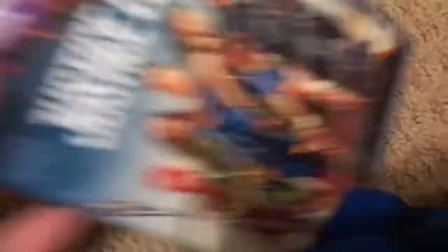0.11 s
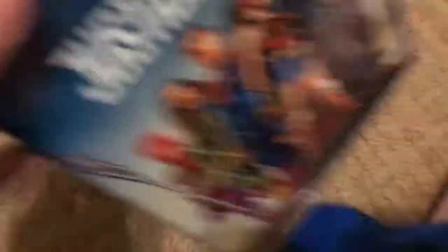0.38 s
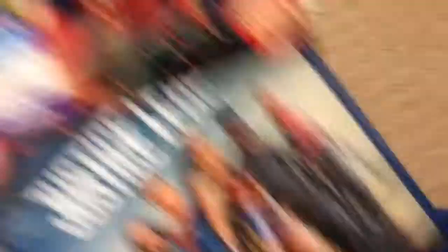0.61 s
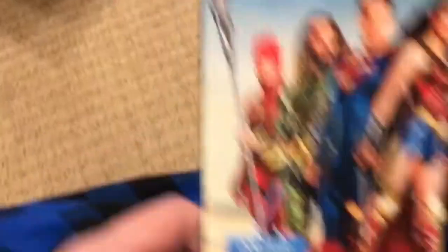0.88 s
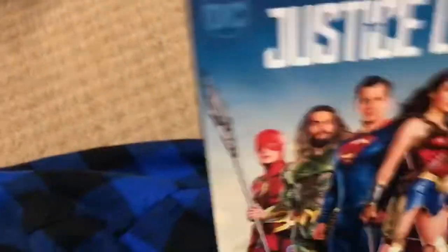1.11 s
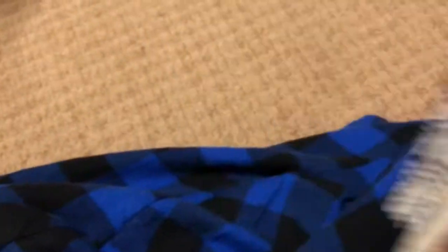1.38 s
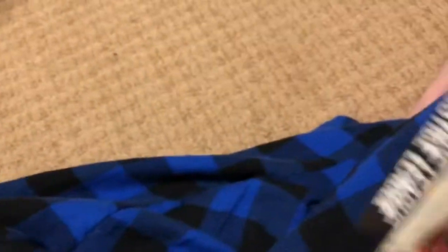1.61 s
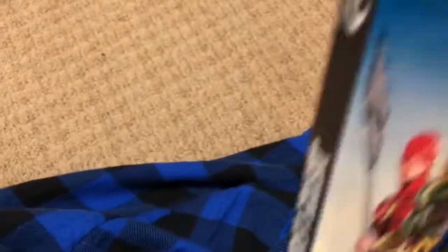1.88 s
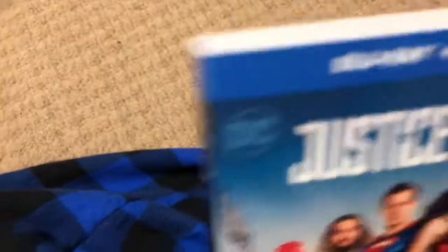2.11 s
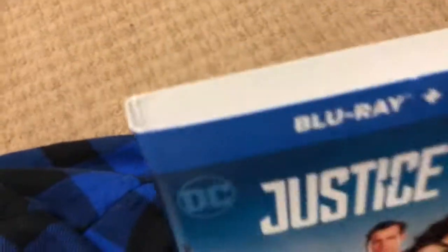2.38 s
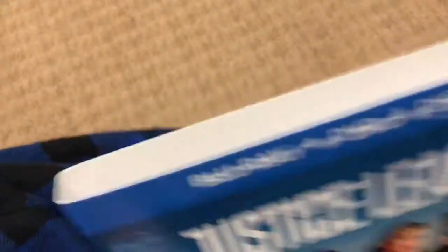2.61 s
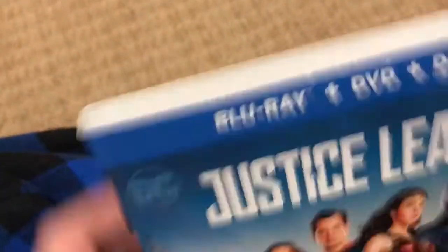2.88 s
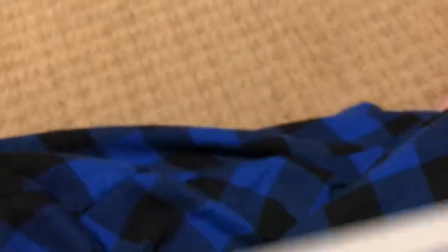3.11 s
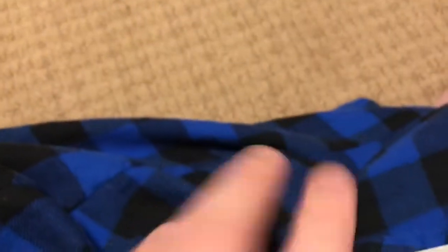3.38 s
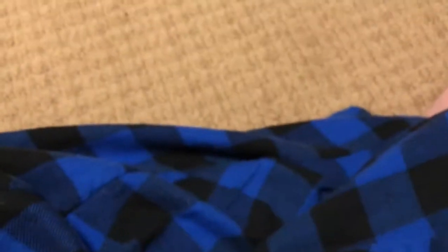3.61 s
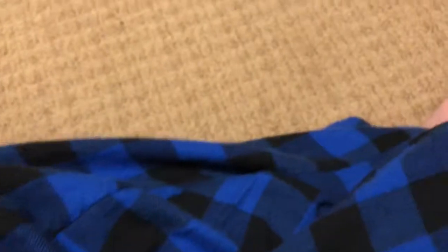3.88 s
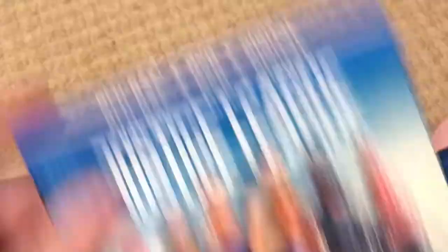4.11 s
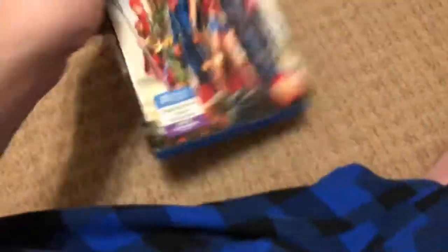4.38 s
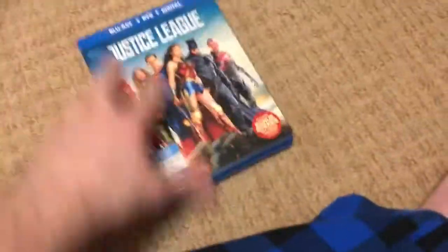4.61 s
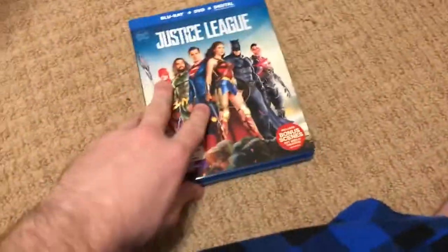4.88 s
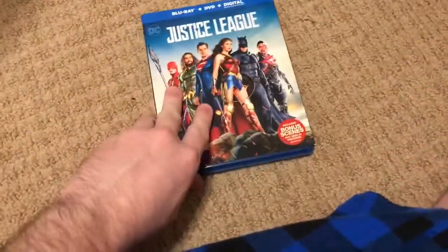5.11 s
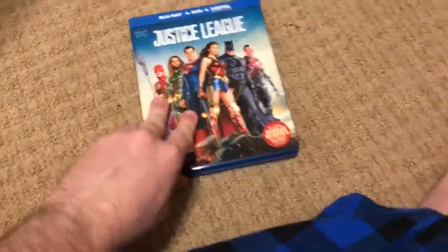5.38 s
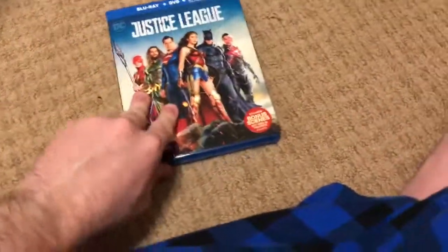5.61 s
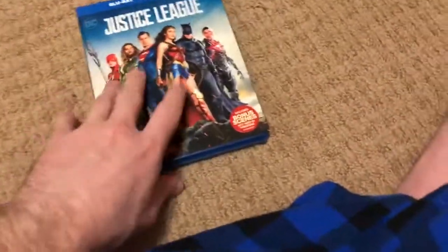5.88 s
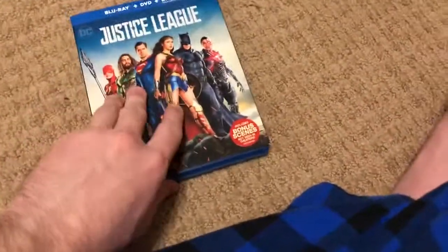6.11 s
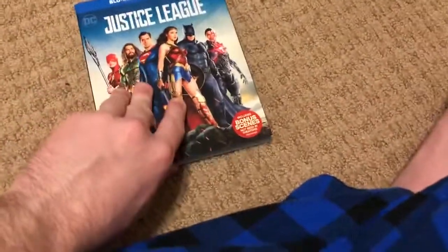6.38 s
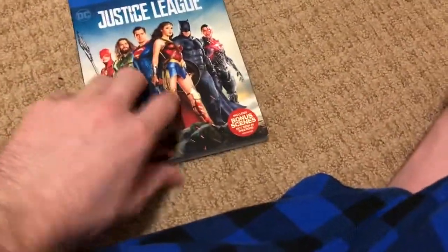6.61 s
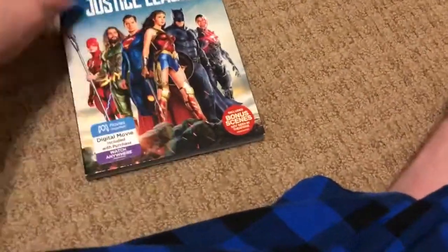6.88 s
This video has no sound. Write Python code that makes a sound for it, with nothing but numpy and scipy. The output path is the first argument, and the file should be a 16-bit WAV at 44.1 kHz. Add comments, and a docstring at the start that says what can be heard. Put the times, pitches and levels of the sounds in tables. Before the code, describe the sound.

Fingers slide and scrape over a thin plastic case close by, with hard clicks, a carpet landing, light taps and one late snap over faint hum.

```python
"""Throughout: low house hum and faint hiss, as shaped noise, under the rubbing of hands, fingers and card
on a plastic disc case close to a phone: stick-slip grains, strongest near 3.2 s, softly answered by a room.
From 0.1 s: cushioned bumps and hard snaps, bursts of micro-impacts ringing the case; loudest snap 1.75 s.
From 2.1 s: thuds on lap and carpet, decaying low sines; heaviest landing 4.6 s. A last hard snap: 6.4 s."""
import sys
import numpy as np
from scipy import signal
from scipy.fft import rfft, irfft, next_fast_len
from scipy.io import wavfile
from scipy.ndimage import uniform_filter1d, map_coordinates

SR = 44100
rng = np.random.default_rng(int(sys.argv[2]) if len(sys.argv) > 2 else 0)


def store_wav(level_fs):
    """Save 16-bit WAV to argv[1]."""
    pcm = np.round(np.clip(np.atleast_2d(level_fs), -1, 1) * 32767)
    wavfile.write(sys.argv[1], SR, pcm.T.astype(np.int16))


def volts(x):
    """Linear amplitude factor 10**(x/20) for a level x in dB, scalar or array-like."""
    e = np.asarray(x, float) / 20
    return 10 ** e


N = 308259  # samples


def unit(x):
    """Scale to rms 1."""
    return x / np.sqrt(np.mean(x ** 2) + 1e-20)


def along(points, hz):
    """(frequency [Hz], value) points read on a log axis."""
    point_hz, value = np.transpose(points)
    return np.interp(np.log(hz + 1), np.log(point_hz + 1), value)


def wobble(rate_hz):
    """Smooth random curve through rate_hz knots a second."""
    knots = rng.standard_normal(int(N * rate_hz / SR) + 4)
    return map_coordinates(knots, [np.arange(N) * rate_hz / SR])


def filtered(x, response):
    """x times a complex response of frequency."""
    size = next_fast_len(N + SR // 2)
    spectrum = rfft(x, size) * response(np.fft.rfftfreq(size, 1 / SR))
    return irfft(spectrum, size)[:N]


def coloured(x, spectrum):
    """x in the given colour, rms 1."""
    return unit(filtered(x, lambda hz: volts(along(spectrum, hz))))


# house hum in the room's low modes: (frequency [Hz], relative density [dB per Hz])
HUM_COLOUR = [(15, -63.5), (25, -24), (64, -11), (94, -2.5), (108, -0.5), (129, -0.5), (145, -19),
              (164, -7), (181, -7), (195, -15), (211, -13), (284, -21.5), (322, -44.5), (404, -47.5),
              (500, -54), (650, -81), (1100, -120)]
# still air and microphone hiss: (frequency [Hz], relative density [dB per Hz])
AIR_COLOUR = [(180, -34), (300, -4), (863, -14), (1130, -24), (1250, -19), (2240, -29), (3030, -24),
              (15200, -30), (16500, -38)]
HUM_DB, AIR_DB = -56, -71  # mean rms levels


def background():
    """House hum that swells a little, and a nearly steady hiss: two shaped noises."""
    hum = coloured(rng.standard_normal(N), HUM_COLOUR)
    air = coloured(rng.standard_normal(N), AIR_COLOUR)
    return volts(HUM_DB + 1.5 * wobble(3)) * hum + volts(AIR_DB + 0.23 * wobble(7.3)) * air


# skin and card sliding on the sleeve, a row a stroke: (start [s], end [s], hiss at start [dB],
# hiss at end [dB], shell scrape re hiss [dB], card drag re hiss [dB])
STROKES = [(0.033, 0.074, -75, -66, 12.5, 15.5), (0.087, 0.187, -71, -71, 2, 5.5),
           (0.202, 0.285, -70, -72.5, 3, 5), (0.305, 0.392, -73.5, -71, -4, -6),
           (0.396, 0.5, -69.5, -75.5, -7, -7.5), (0.67, 0.705, -89, -85.5, 13.5, 12.5),
           (0.85, 0.922, -78, -68, -6, -6), (0.933, 0.993, -62, -65, -2, 1),
           (1.065, 1.146, -66, -64.5, 1.5, 0.5), (1.197, 1.283, -67, -72.5, 4, -3),
           (1.327, 1.42, -69.5, -58, -9, -10), (1.42, 1.483, -61, -66, -2, -4),
           (1.544, 1.637, -74, -70, 7.5, 7.5), (1.645, 1.668, -74.5, -76, 0, 16.5),
           (1.681, 1.724, -64.5, -66, 8, 7.5), (1.763, 1.822, -59, -71, 7, -11),
           (1.835, 1.889, -71, -65, 8.5, 4), (1.983, 2.08, -66.5, -61, 1, -2.5),
           (2.075, 2.113, -58.5, -55.5, 0.5, -2), (2.212, 2.338, -69, -75, 7, 6.5),
           (2.474, 2.544, -73, -69.5, 4.5, 0.5), (2.61, 2.703, -70, -53.5, -1, -5),
           (2.713, 2.784, -65.5, -59.5, -2, -12), (2.792, 2.884, -63, -62.5, -0.5, -5),
           (2.924, 2.97, -63, -64, 1.5, 7), (2.992, 3.055, -81, -63, 8.5, 4.5),
           (3.05, 3.098, -54.5, -47, 3.5, 0.5), (3.103, 3.185, -51.5, -43, -1.5, -5),
           (3.182, 3.243, -45, -45, -4.5, -9), (3.288, 3.329, -71, -62, 2, -6.5),
           (3.385, 3.38, -78, -69.5, 0, -8.5), (3.498, 3.531, -47.5, -43, -2.5, -9.5),
           (3.537, 3.583, -51.5, -42.5, -2.5, -9.5), (3.605, 3.653, -60.5, -77, -5, -2),
           (3.7, 3.744, -73, -63, -8, -9), (3.755, 3.766, -47.5, -55, -11, -11),
           (3.807, 3.962, -67.5, -73.5, -5, -11), (3.961, 4.011, -70, -66.5, -1.5, -1.5),
           (4.022, 4.04, -49, -50, -9, -9), (4.047, 4.121, -58, -58, -6, -9.5),
           (4.223, 4.241, -65.5, -75, -2, -3), (4.262, 4.33, -79.5, -80.5, 3, 2),
           (4.488, 4.527, -52.5, -64, 0.5, 5), (4.554, 4.623, -75, -74, 13.5, 14.5),
           (4.677, 4.736, -66.5, -68, -3.5, -9), (4.749, 4.833, -67.5, -71.5, -1, 4),
           (5.044, 5.17, -82, -74, -3, 0.5), (5.178, 5.303, -75.5, -83, -2.5, 0.5),
           (5.59, 5.61, -77, -81, 1.5, 2.5), (5.7, 5.789, -83, -75, -4.5, 1),
           (5.979, 6.056, -77.5, -78, 4, 6.5), (6.414, 6.444, -43.5, -61, -7, -5.5),
           (6.449, 6.5, -73.5, -80, 7.5, 5), (6.784, 6.894, -79.5, -64, -4, -8.5),
           (6.902, 6.962, -65, -75, -6, -6)]
# holding hands, never quite still: (time [s], surface hiss [dB])
HOLD = [(0, -77.5), (0.6, -101), (1.0, -72), (2.3, -80), (2.4, -88.5), (3.0, -75), (3.4, -99.5),
        (3.7, -85.5), (4.2, -86), (4.45, -89), (4.6, -79), (4.9, -88), (5.5, -98), (6.0, -88.5),
        (6.15, -105), (6.7, -86.5), (6.99, -84)]
# body of the holding rub: (scrape re hiss [dB], drag re hiss [dB], rumble re hiss [dB])
HOLD_BODY_DB = [6.5, 6, 4.5]
ATTACK_S, RELEASE_S, QUIET_DB = 0.01744, 0.034, -89.5  # times from quiet up and back down
# rumble re drag in a stroke of light hiss level; rumble lost per dB that a stroke is louder
RUMBLE_DB, LIGHT_DB, RUMBLE_LOSS_DB_PER_DB = 0.5, -70.5, 0.4


def stroke_levels():
    """dB of hiss, scrape, drag and rumble: the loudest stroke at each moment, over the holding hands."""
    time_s = np.arange(N) / SR
    level_db = np.interp(time_s, *np.transpose(HOLD)) + np.r_[0, HOLD_BODY_DB][:, None]
    for start_s, end_s, start_db, end_db, scrape_db, drag_db in STROKES:
        near = slice(max(round(start_s * SR) - SR // 8, 0), round(end_s * SR) + SR // 8)
        t = time_s[near]
        rise_db = max(start_db - QUIET_DB, 6) * np.maximum(start_s - t, 0) / ATTACK_S
        fall_db = max(end_db - QUIET_DB, 6) * np.maximum(t - end_s, 0) / RELEASE_S
        ramp_db = np.interp(t, [start_s, max(end_s, start_s + 1 / SR)], [start_db, end_db])
        hiss_db = ramp_db - rise_db - fall_db
        louder_db = max(start_db, end_db) - LIGHT_DB
        rumble_db = drag_db + RUMBLE_DB - RUMBLE_LOSS_DB_PER_DB * louder_db
        stroke_db = hiss_db + np.c_[[0, scrape_db, drag_db, rumble_db]]
        level_db[:, near] = np.maximum(level_db[:, near], stroke_db)
    return level_db


# colours of surface hiss, shell scrape, card drag and rumble:
# (frequency [Hz], relative density [dB per Hz])
HISS_COLOUR = [(2500, -37.5), (5200, -2.5), (7000, 0), (10000, -4.5), (13000, -7.5), (16000, -3)]
SCRAPE_COLOUR = [(1300, -42), (2400, -5.5), (3300, 0.5), (5000, -6.5), (8000, -24.5)]
DRAG_COLOUR = [(450, -40), (900, 2.5), (1400, 8.5), (2300, 1), (4000, -24.5)]
RUMBLE_COLOUR = [(120, -35.5), (300, 8), (600, -3), (850, -0.5), (1500, -50.5)]


def rubbing():
    """Dense stick-slip grains, in four colours, under each stroke and the holding hands."""
    grip_db = 0.95 * wobble(70)
    grains = rng.standard_normal(N) * volts(1.8 * wobble(900) + 1.1 * wobble(250))
    _, _, cells = signal.stft(grains, SR, nperseg=512)
    # the grip shifts which spots of the card ring
    patches = uniform_filter1d(rng.standard_normal(cells.shape), 8, axis=0)
    patches = uniform_filter1d(patches, 8, axis=1)
    grains = signal.istft(cells * volts(2.1 * unit(patches)), SR, nperseg=512)[1][:N]
    colours = (HISS_COLOUR, SCRAPE_COLOUR, DRAG_COLOUR, RUMBLE_COLOUR)
    layers = [coloured(grains, colour) for colour in colours]
    return np.sum(volts(stroke_levels() + grip_db) * layers, axis=0)


# decay of the room: (frequency [Hz], t60 [s])
ROOM_T60_S = [(200, .35), (1000, 0.53), (3000, 0.38), (6000, 0.1), (12000, 0.085)]
# strength of the room's answer: (frequency [Hz], level [dB])
WALLS_DB = [(200, -15.5), (1000, -18.5), (2000, -21.5), (2500, -24), (3300, -20), (4500, -22.5),
            (8000, -20.5), (14000, -24.5)]


def room(x):
    """Noise tails, each frequency dying at its own speed; a new tail every half second."""
    out, step = np.zeros(N + 2 * SR), SR // 2
    for start in range(0, N, step):
        hz, t, cells = signal.stft(rng.standard_normal(step), SR, nperseg=256)
        decay = volts(-60 * t / along(ROOM_T60_S, hz)[:, None])
        tail = signal.istft(cells * decay, SR, nperseg=256)[1]
        answer = signal.fftconvolve(x[start:start + step], tail / np.linalg.norm(tail))
        out[start + 260:][:len(answer)] += answer  # delay in samples
    return filtered(out[:N], lambda hz: volts(along(WALLS_DB, hz)))


def ringing(blows, modes):
    """Blows through a group of damped modes of alternating sign; a mode's dB is its peak after a unit blow."""
    def response(hz):
        total = 0
        for k, (centre_hz, width_hz, peak_db) in enumerate(modes):
            resonance = 1j * hz / (centre_hz ** 2 - hz ** 2 + 1j * hz * width_hz)
            total = total + (-1) ** k * volts(peak_db) * SR / (2 * np.pi) * resonance
        return total
    return filtered(blows, response)


def contacts(events, hardness):
    """Unit-energy bursts of micro-impacts swelling and dying in a few contact times, four a contact."""
    t = np.arange(SR // 20) / SR
    chance = rng.standard_normal((len(events), 4, len(t)))
    drive = np.zeros((4, N + len(t)))
    for (time_s, level_db, *rest_db, contact_ms), jolts in zip(events, chance):
        u = t * 1000 / max(contact_ms, .03)
        rattle = volts(-16) * np.exp(-t / 0.0035)  # loose parts rattle on for a moment
        burst = jolts * (u ** 0.96 * np.exp(-u) + rattle)
        burst /= np.linalg.norm(burst, axis=1, keepdims=True)
        burst[:, round(contact_ms * SR / 1000)] += hardness  # one clean blow
        burst /= np.linalg.norm(burst, axis=1, keepdims=True)
        start = round(time_s * SR)
        drive[:, start:start + len(t)] += volts(level_db + np.r_[0, rest_db])[:, None] * burst
    return drive[:, :N]


# cushioned bumps and taps:
# (time [s], shell [dB], boom re shell [dB], lid re shell [dB], edge re shell [dB])
BUMPS = [(0.1248, -56, 10, 16, -16), (0.5611, -72.5, -5, 17.5, -8), (0.688, -56.5, 6.5, 7, -15),
         (0.7416, -72, -3, 22.5, -10), (1.639, -32.5, -13, 4.5, -11), (2.1965, -59, 12, 6, -5),
         (2.2472, -37, -11, -4.5, -7), (2.2756, -35, -0.5, 4.5, -16), (3.3886, -59.5, -18, -4, -5),
         (3.582, -33.5, -4, -11, -2), (3.59, -46, 14.5, -0.5, -2), (3.821, -51.5, -0.5, 4.5, 7),
         (3.9915, -49.5, 1, -1, -7), (4.2598, -61.5, -4.5, 8, -8), (4.482, -25.5, -3.5, 4.5, 3),
         (4.518, -38.5, -12, 2, 0), (4.547, -30.5, -2, 2.5, 3), (4.557, -33, -8.5, 3, -6),
         (4.5765, -34.5, 11.5, 9, -14), (4.582, -34.5, 6.5, 3, 6), (4.5985, -34.5, -6, 5, 2),
         (4.7556, -54, 6, 8, 6), (5.6036, -60, -3.5, 0.5, 11), (5.8265, -72, 14.5, 7, 0),
         (5.9525, -44, 1, 6, 1.5), (5.9685, -44.5, -3, 0, 1), (6.0453, -61, 6, 2, -6.5),
         (6.393, -60, -1.5, 20.5, -7.5), (6.4098, -31.5, -2, 2.5, -6), (6.589, -61.5, 13.5, 13, -12),
         (6.668, -53, -0.5, 4.5, 4.5)]
# ringing of the case, low to high: (frequency [Hz], width [Hz], peak [dB])
BOOM_MODES = [(186, 60, 0), (292, 89, 4), (346.3, 47, 0), (525, 265, 7.5)]
LID_MODES = [(657, 260, 0), (810, 146, -0.39), (970, 270, -0.5), (1291, 310, 0), (1600, 350, 0.48)]
SHELL_MODES = [(1770, 790, -10.5), (2345, 220, -7), (2670, 180, -5.5), (3270, 310, -2.5), (3830, 210, -8)]
RIM_MODES = [(4140, 232, -12.5), (4490, 490, -5), (5600, 510, 1.5), (5638, 370, -1.5)]
EDGE_MODES = [(6230, 860, -4), (7560, 1300, -1), (9200, 1400, -0.5), (11980, 1700, -1.5),
              (15000, 3300, -2.5)]
# contact time at the light-tap level; heavier bumps sink in longer
LIGHT_TAP_MS, LIGHT_TAP_DB, MS_PER_DB = 1.9, -55.5, 0.0656


def bumps():
    """Fingertips and carpet press longer, so the panels boom and the edges rattle."""
    rows = [(*row, LIGHT_TAP_MS + MS_PER_DB * (row[1] - LIGHT_TAP_DB)) for row in BUMPS]
    groups = (SHELL_MODES + RIM_MODES, BOOM_MODES, LID_MODES, EDGE_MODES)
    drives = contacts(rows, hardness=0.68)
    return sum(ringing(blows, modes) for blows, modes in zip(drives, groups))


# hard snaps and ticks:
# (time [s], shell [dB], lid re shell [dB], rim re shell [dB], edge re shell [dB])
SNAPS = [(0.1607, -47, 3.5, 7, -9), (0.6858, -47.5, -2, -21, -23), (0.7028, -54, -10, -11, -14),
         (0.9613, -43, -7, 2, 6), (0.9811, -10.5, -21.5, 2, -0.5), (1.0394, -49.5, 9.5, -8, -10),
         (1.195, -41.5, -1.5, -11, -14), (1.518, -50.5, -11, -11, -10), (1.631, -45, 1, -6, -1),
         (1.6371, -17, -7.5, 2, -4.5), (1.7069, -46.5, -16, 10, 6.5), (1.7465, -6, -28.5, 6, -5),
         (2.308, -54, 5, 9, -1), (2.834, -45, 0, 3, -7), (2.8524, -43, -2, -9, -13),
         (2.8794, -43.5, -20, -5, -9), (2.9165, -52.5, -4, 15, -1), (3.01, -47, -8, 0, -11.5),
         (3.5786, -30, -1.5, 1, 3), (4.194, -50.5, -1.5, -3, -6.5), (4.666, -47.5, -9, 2, 5),
         (4.7717, -49, 10, -13, -12), (4.875, -49, -2, -16, -17), (6.4093, -22.5, 3, 4.5, 4.5)]
SNAP_MS = 0.14  # contact time


def snaps():
    """Hard plastic on plastic: too brief to move the big panels, it rings shell, lid, rim and edge."""
    rows = [(*row, SNAP_MS) for row in SNAPS]
    groups = (SHELL_MODES, LID_MODES, RIM_MODES, EDGE_MODES)
    drives = contacts(rows, hardness=1.6)
    return sum(ringing(blows, modes) for blows, modes in zip(drives, groups))


# case landing or swinging against lap and carpet:
# (time [s], level before the soft onset [dB], pitch [Hz], t60 [s])
THUDS = [(2.129, -49.5, 53.4, 0.26), (2.969, -41, 70.2, 0.18), (3.58, -31, 185, 0.038),
         (4.484, -30, 214, 0.091), (4.5767, -13, 212, 0.034), (4.579, -22.5, 90, 0.12)]


def thuds():
    """A soft landing pushes air once and dies in a few low cycles: decaying sines."""
    out, t = np.zeros(N + SR), np.arange(SR // 3) / SR
    onset = 1 - np.exp(-t / 0.0048)
    for time_s, level_db, pitch_hz, t60_s in THUDS:
        thud = volts(level_db - 60 * t / t60_s) * np.sin(2 * np.pi * pitch_hz * t)
        out[round(time_s * SR):][:len(t)] += thud * onset
    return out[:N]


def scene():
    """Case close by, a little room, the house behind."""
    case = rubbing() + bumps() + snaps() + thuds()
    return (background() + case + room(case))[None]


def band_limit(x):
    """A steep low-pass at the top of the band."""
    return signal.sosfilt(signal.butter(12, 16860, fs=SR, output="sos"), x)


# microphone response: (frequency [Hz], gain [dB])
MIC_DB = [(20, -33), (45, -1.5), (70, -2), (15700, 0), (16300, -27.5), (17000, -55)]


def record(dry):
    """The phone's microphone drops the deep bass and the top treble."""
    mix = filtered(dry[0], lambda hz: volts(along(MIC_DB, hz)))[None]
    return band_limit(mix)


dry = scene()
out = record(dry)
store_wav(out)
```